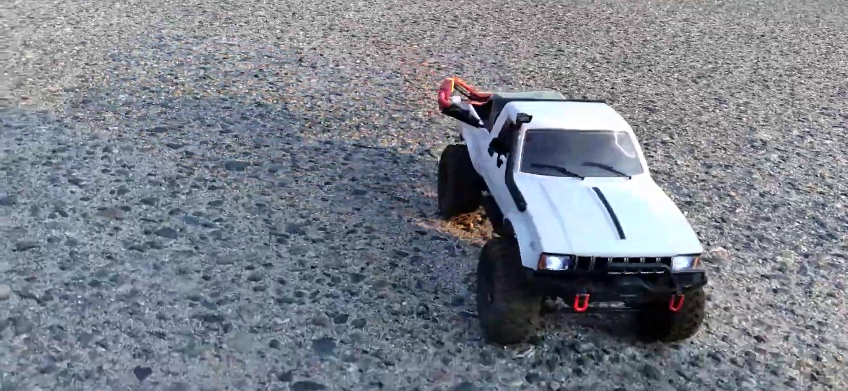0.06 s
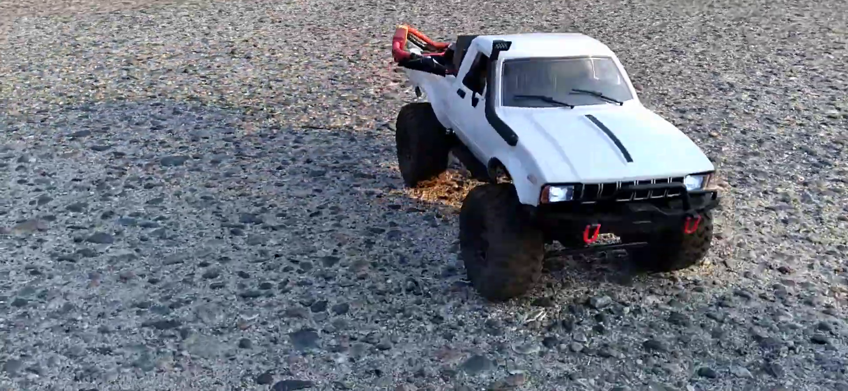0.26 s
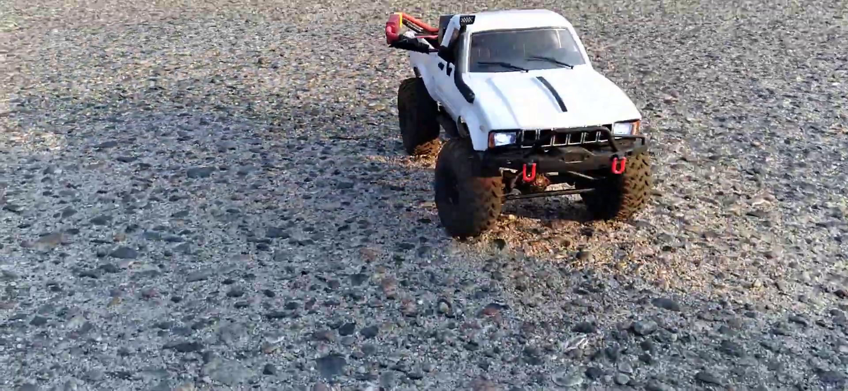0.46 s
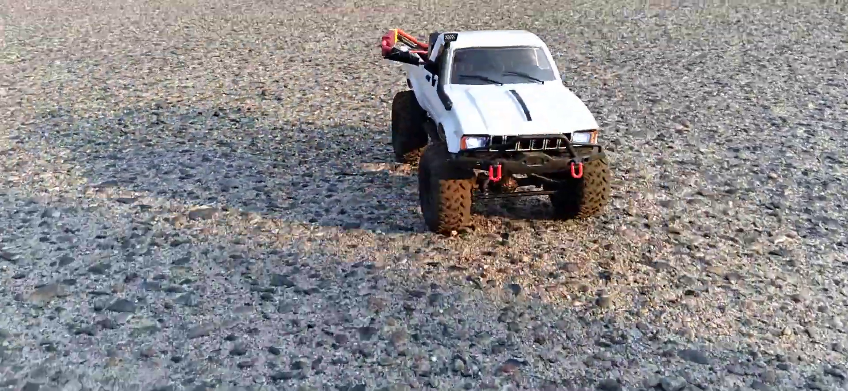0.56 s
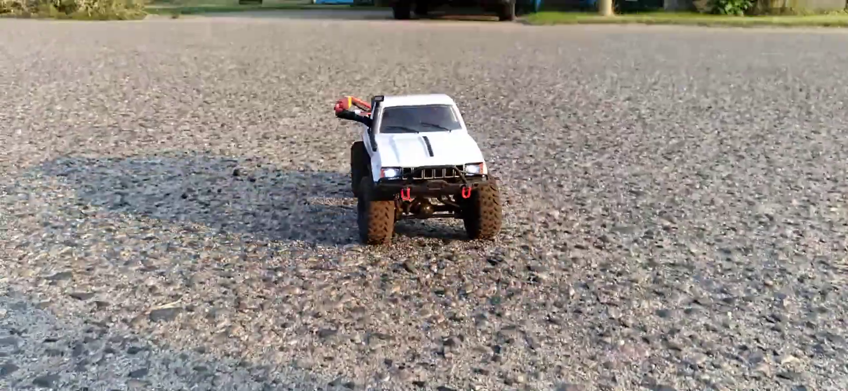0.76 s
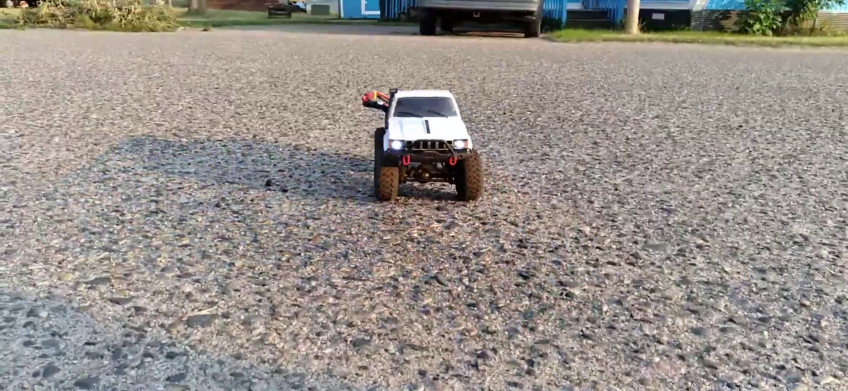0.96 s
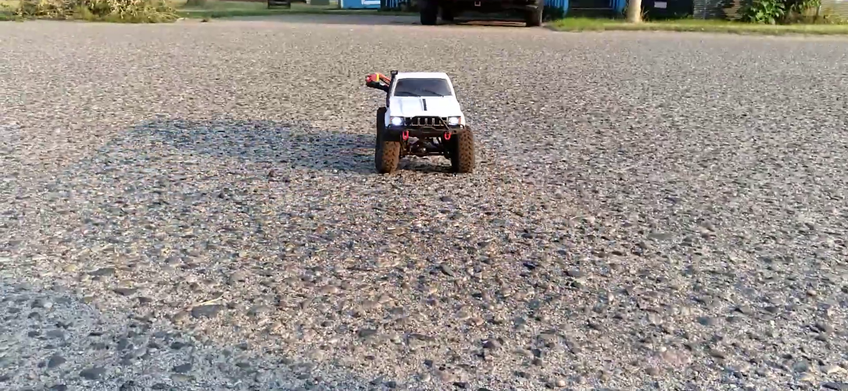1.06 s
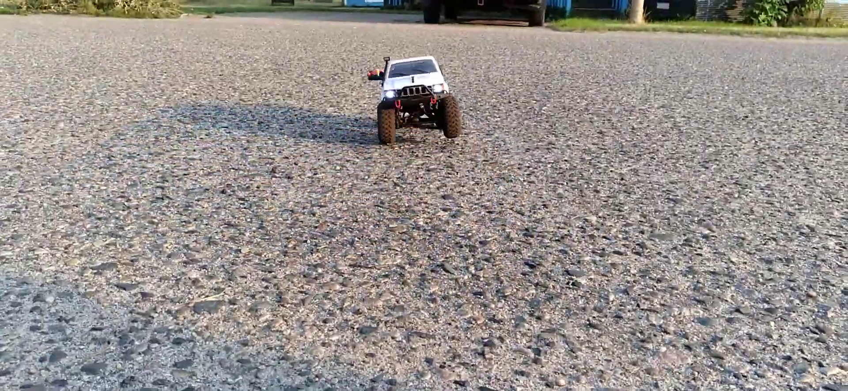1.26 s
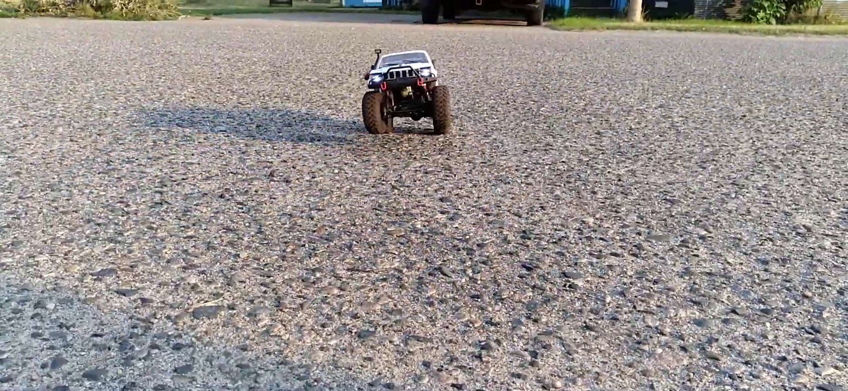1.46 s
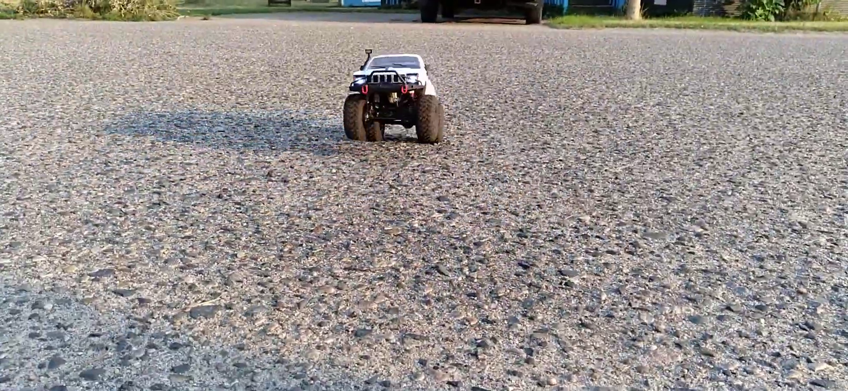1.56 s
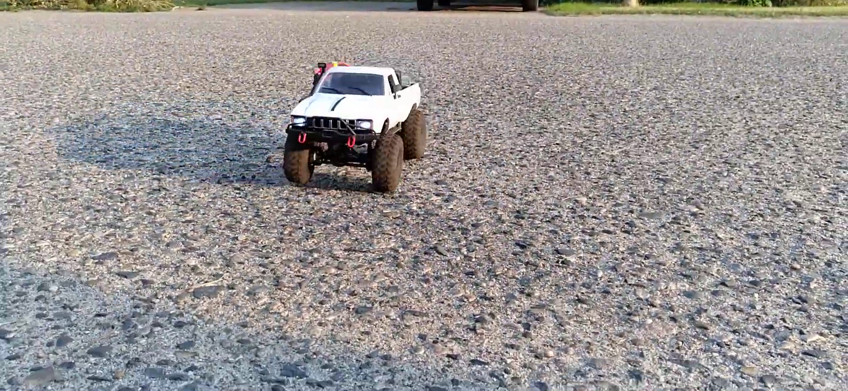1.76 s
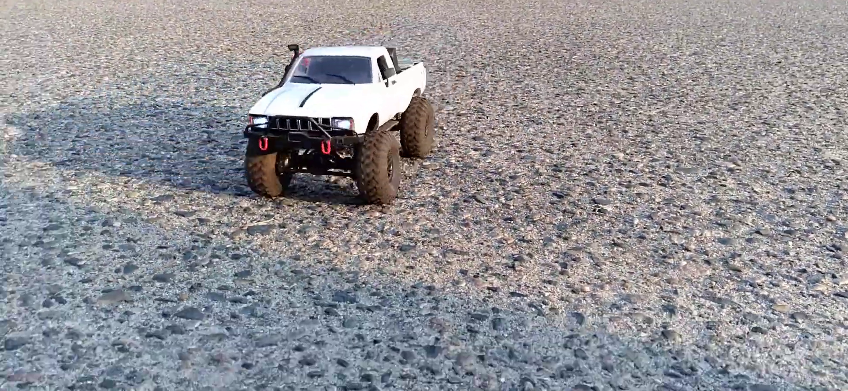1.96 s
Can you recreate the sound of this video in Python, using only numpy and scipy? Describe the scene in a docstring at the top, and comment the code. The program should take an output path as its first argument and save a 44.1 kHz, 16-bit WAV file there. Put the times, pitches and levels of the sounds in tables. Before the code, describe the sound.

Bright, scratchy plastic gear whirr from a toy electric truck, reversing, pausing, then darting forward and stopping

```python
"""The loose gear teeth of a small electric model truck rattle its plastic shell: random scrapes through modes.
It backs away over coarse asphalt, stops, darts forward and stops, near a phone with two microphone ports.
Gear mesh tones whine, grains of tone whirr, and noise bursts make driveline clacks and dull axle knocks.
Tyres hum as narrow noise, wind puffs thump the right port as sagging tones, and soft noise is the outdoor air."""
import sys
import numpy as np
from scipy import signal
from scipy.fft import rfft, irfft
from scipy.io import wavfile
from scipy.ndimage import uniform_filter1d, map_coordinates

SR = 44100
rng = np.random.default_rng(int(sys.argv[2]) if len(sys.argv) > 2 else 0)


def dump_mix(stems):
    """Bounce the given channels to the path in sys.argv[1] as a 16-bit WAV at rate SR."""
    frames = np.atleast_2d(stems).T  # one column per channel
    limited = np.clip(frames, -1, 1)  # hard clip at full scale
    pcm = np.round(limited * 32767).astype(np.int16)
    wavfile.write(sys.argv[1], SR, pcm)


N = 88200
T = np.arange(N) / SR

# Core band of the rattle, 7-11 kHz: (time [s], level before the common gain, pan and throb [dB])
RATTLE = [(0, -70.5), (.015, -52), (.09, -75), (.105, -51.5), (.14, -62), (.165, -40.5), (.19, -42.5),
          (.215, -47.5), (.23, -38), (.42, -33.5), (.47, -31), (.53, -24.5), (.56, -23.5), (.62, -30.5),
          (.85, -37.5), (1.01, -36), (1.1, -39), (1.17, -33), (1.195, -41.5), (1.216, -49), (1.226, -34.5),
          (1.26, -26.5), (1.52, -22), (1.6, -27), (1.69, -30.5), (1.73, -38.5), (1.79, -44), (1.835, -55.5),
          (1.87, -45), (1.93, -57), (2, -59)]
# Other bands relative to the core: (time [s], 4-7 kHz [dB], 2-4 kHz [dB], under 2 kHz [dB],
# over 11 kHz [dB], left minus right before the port offset [dB])
COLOUR = [(0, -9.5, -20, -16, -26, -1), (.14, -0.5, -9.5, -10.5, -38, -6.5), (.18, 5, -5, -8, -12, -5),
          (.4, 6, -8.5, -16, -10, -3), (.52, -3.5, -9.5, -29, -11.5, -3.5), (.58, 0, -12, -21, -7, -5),
          (.72, 2, -6.5, -17.5, -6.5, -4.5), (1.0, -2, -7, -28, -7, -5.5),
          (1.15, -5.5, -7, -23, -7.5, -0.5), (1.25, -2, -14, -17.5, -7.5, -0.5),
          (1.35, -5, -16.5, -34, -13.5, -3.5), (1.5, -7.5, -18, -46.5, -12.5, 0.5),
          (1.66, -2, -17, -37.5, -13.5, -2), (1.76, -9, -25, -17, -1.5, -1), (2, -10, -9, -14, 2, -0.5)]
# Centres of the core band and then the others, in the order of COLOUR: (frequency [Hz])
BAND_CENTRES_HZ = [8800, 5300, 3000, 1350, 13500]
# How far each band follows the gear throb, in the same order: (share [1])
THROB_SHARES = [1, .5, .4, .4, .3]
# Broad colour of the plastic shell: (frequency [Hz], gain [dB])
SHELL = [(250, -28), (500, -20.5), (900, -21), (1400, -17), (2200, -13.5), (3300, -16.5), (4200, -18.5),
         (4700, -8), (6850, -8.5), (9400, -1.5), (11500, 0), (16000, -1.5)]
# Shell modes, before the broad colour: (frequency [Hz], width [Hz], backing level [dB],
# forward level [dB], left minus right [dB])
SHELL_MODES = [(1289, 267, 3.5, -2.5, 1.5), (2556, 93, -0.5, -1.5, -6), (3307, 63, 1, -1.5, 11.5),
               (3876, 122, -8, 5.5, -5.5), (5420, 155, -5.5, -2, 2.5), (7497, 25, 0, -2, 22.5),
               (8050, 48, -2.5, -4, 32.5), (8414, 133, 2.5, 11.5, 9.5), (8814, 176, 7, 10.5, -8),
               (9300, 154, 0.5, -32, -23), (9360, 560, -44, 14, -8.5)]
# Two out-of-round gears: (turns per mesh cycle [1], throb [dB])
GEARS = [(1 / 68, 2.5), (1 / 121.5, 1.8)]
# Outdoor background colour: (frequency [Hz], gain [dB])
AIR = [(20, -39), (50, 6), (200, 2.5), (1400, -9), (2500, -10.5), (5000, -23), (9000, -7), (16000, -18)]
# Tyres rolling near the phone: (time [s], hum level [dB], rumble level [dB])
ROLL = [(.1, -78.5, -88), (.25, -60, -81), (.4, -56.5, -61.5), (.5, -66, -69), (.65, -66, -78),
        (.76, -59.5, -66), (1.1, -67.5, -62.5), (1.3, -87, -94)]
# Driveline clacks: (time [s], level [dB], ring pitch [Hz], left minus right [dB], rise [s],
# time to fall 60 dB [s], share of broad crack [1])
CLACKS = [(.009, -31, 9100, -8, 0.00062, 0.014, 0.047), (0.114, -35.5, 8500, -1, 0.0027, 0.013, 0.35),
          (0.16, -31, 7250, 2, .001, 0.032, 0.29), (0.171, -25.5, 7200, 0, 0.005, 0.073, 0.29),
          (0.221, -18.5, 8000, -2, 0.0048, 0.026, 0.15), (0.2447, -13.5, 8130, 3, 0.0016, 0.022, 0.059),
          (0.267, -18, 7300, -1, 0.0042, 0.049, .15), (0.295, -22, 9000, 0, .002, .025, 0.18),
          (.557, 0, 9300, -7, 0.0015, 0.034, 0.042), (0.569, -9, 9300, 2, 0.001, 0.021, 0.2),
          (1.097, -15, 8350, 8, 0.0015, 0.0085, 0.63), (1.1456, -7, 8000, 10.5, 0.00029, 0.0092, 0.2),
          (1.245, -12, 7290, 3, 0.0042, 0.004, 0.11), (1.352, -10, 9600, 13.5, 0.00067, 0.029, 0.23),
          (1.7038, -15, 8050, -1, 0.0066, 0.056, 0.087), (1.78, -24.5, 8260, -14, 0.0014, 0.024, 0.055),
          (1.842, -38, 8200, 9, 0.00046, 0.013, 0.6), (1.857, -17, 8450, -11, 0.0011, 0.039, 0.017),
          (1.887, -34, 8500, -9, 0.0022, 0.086, 0.029)]
# Gear tones: (time [s], mesh pitch [Hz], mesh whine level [dB], low whine level [dB])
WHINE = [(.16, 3004, -110, -110), (.24, 4400, -80, -55), (.27, 4913, -80, -45), (.31, 5490, -70, -47.5),
         (.37, 4220, -82, -67), (.41, 4500, -75, -47.5), (.5, 5330, -65, -43), (.535, 5750, -65, -42),
         (.58, 5907, -110, -88), (1.27, 4506, -62, -81), (1.305, 4600, -29, -50), (1.35, 4766, -28, -51),
         (1.535, 4830, -25, -50), (1.555, 4810, -38, -46), (1.61, 4980, -26, -67),
         (1.68, 5190, -65.5, -100)]
# Axle and body knocks: (time [s], level [dB], pitch [Hz], share of ring [1])
KNOCKS = [(.17, -33.5, 1160, 0.22), (.377, -36, 730, 0.74), (.45, -36.5, 1010, 0.13),
          (0.608, -32.5, 413, 0.18), (1.232, -35, 503, .2), (1.25, -24, 511.6, 0.36),
          (1.334, -30.5, 574, 0.053), (1.705, -36, 790, 0.097), (1.74, -40, 1225, 0.9),
          (1.821, -48.5, 485.4, 1.9)]
# Narrow grainy whirr while the truck backs: (time [s], centre [Hz], level [dB])
WHIRR = [(.2, 5000, -90), (.31, 5150, -34), (.375, 5420, -26), (.415, 5250, -27), (.455, 5400, -37),
         (.5, 5350, -28), (.56, 4700, -27), (.7, 5000, -90)]
# Wind at the right port: (time [s], peak level [dB], starting pitch [Hz], length unit [s])
PUFFS = [(0.807, -34.5, 96, 0.035), (0.879, -31, 119, 0.033), (0.895, -30.5, 75, 0.042),
         (0.961, -33, 92, 0.023), (1.025, -36.5, 78, 0.034), (1.191, -36.5, 80.6, 0.024)]

REVERSES_S = 1.21  # backing before, forward after
LEFT_LAG_S = 0.0002936
TEETH_PER_S, TOOTH_SCATTER_DB = 1900, 1.5
TOOTH_POWER_DECAY_S, HISS = .0007, 1.1
SHARED = 0.51  # share of rattle power common to both ports
MODE_WANDER, MODE_WANDER_PER_S = .015, 12  # wander as a share of mode pitch
MODE_FLICKER_DB = 3.5
ROUGH_DB, OWN_FLICKER_DB = .8, 1.2
RATTLE_GAIN_DB = 3  # gain added to every rattle band
LEFT_PORT_DB = 3  # the left port is this much more open to the rattle
AIR_DB = -67.5
HUM_HZ, HUM_WIDTH_HZ, RUMBLE_HZ = 206.4, 18, 132
CLACK_RING_WIDTH_HZ, CLACK_TAIL_DB, CLACK_TAIL_S = 150, -41, .12
CRACK_HZ, CRACK_WIDTH_HZ = 6000., 6000.
WHINE_JITTER, WHINE_FLUTTER_DB = .002, 2.
WHINE_THROB = .8  # share of the gears' throb
LOW_WHINE_RATIO, LOW_OVERTONE_DB = .1875, 7
LOW_BLUR_BACKING, LOW_BLUR_FORWARD = 1., .7  # radians
LOW_FLICKER_BACKING_DB, LOW_FLICKER_FORWARD_DB = 3.5, 1
KNOCK_T60_S, KNOCK_FLOOR_HZ = .07, 260
WHIRR_GRAIN_PER_S = 350
PUFF_LEFT_DB, PUFF_GRIT = -45, 0.098
TOP_HZ = 15900


def undb(db):
    """Decibels to an amplitude factor."""
    return 10 ** (np.asarray(db, float) / 20)


def col(table, count):
    """One column of a time table, drawn over the whole scene."""
    a = np.array(table, float)
    return np.interp(T, a[:, 0], a[:, count])


def on_log(table, hz):
    """Read a frequency table along a logarithmic pitch axis."""
    a = np.array(table, float)
    return np.interp(np.log(np.maximum(hz, 1)), np.log(a[:, 0]), a[:, 1])


def unit(x):
    """Scale to an RMS of one."""
    return x / np.sqrt(np.mean(x ** 2))


def ring(x, hz, width_hz):
    """One resonance, excited by x."""
    return signal.lfilter(*signal.iirpeak(hz, hz / width_hz, fs=SR), x)


def walk(rate):
    """Smooth random wander with an RMS of one, from about rate fresh draws a second."""
    k = int(SR / rate)
    steps = np.repeat(rng.standard_normal(N // k + 1), k)
    return unit(uniform_filter1d(uniform_filter1d(steps, k), k)[:N])


def ports(x, pan_db):
    """A source reaches the left microphone port a little late, with a level offset between the ports."""
    late = map_coordinates(x, [(T - LEFT_LAG_S) * SR], mode="nearest")
    return np.array([late * undb(pan_db / 2), x * undb(-pan_db / 2)])


def split_db(pan_db):
    """Share a left-minus-right offset between the two ports, in dB."""
    return np.array([[.5], [-.5]]) * pan_db


def gear_throb(mesh):
    """Out-of-round gears swell the level once per turn, in dB."""
    return sum(db * np.cos(turns * mesh) for turns, db in GEARS)


def teeth():
    """Random tooth knocks, each a short scrape of uneven size, over a finer hiss."""
    size = undb(TOOTH_SCATTER_DB * rng.exponential(size=N))
    hit = (rng.random(N) < TEETH_PER_S / SR) * size
    fade = np.exp(-1 / (TOOTH_POWER_DECAY_S * SR))
    power = unit(signal.lfilter([1], [1, -fade], hit ** 2))
    scrapes = power ** .5 * rng.standard_normal(N)
    return unit(scrapes + HISS * rng.standard_normal(N))


def shell(x):
    """Spectrum of the plastic shell: broad colour over flexing modes that differ backing and forward."""
    f = np.fft.rfftfreq(N, 1 / SR)
    modes = x * undb(-5.0)  # sound that bypasses the modes
    for hz, width, back_db, forward_db, pan_db in SHELL_MODES:
        gain = undb(np.where(T < REVERSES_S, back_db, forward_db) + split_db(pan_db))
        wander_hz = MODE_WANDER * hz * walk(MODE_WANDER_PER_S)
        shift = np.exp(2j * np.pi * np.cumsum(wander_hz) / SR)
        tone = np.real(signal.hilbert(ring(x, hz, width)) * shift)
        modes = modes + gain * undb(MODE_FLICKER_DB * walk(30.16)) * tone
    return rfft(modes) * undb(on_log(SHELL, f)), f


def rattle(mesh):
    """Loose teeth shake the shell, throbbing once per turn of two gears; each band has its own level."""
    common = ports(teeth(), 0)
    separate = np.array([teeth(), teeth()])
    x = np.sqrt(SHARED) * common + np.sqrt(1 - SHARED) * separate
    throb = gear_throb(mesh) * np.where(T < REVERSES_S, .4, 1)
    throb = throb + ROUGH_DB * (walk(41.4) + walk(150))
    spectrum, f = shell(x)
    order, out = np.argsort(BAND_CENTRES_HZ), 0
    for k in range(5):
        # Neighbouring bands cross-fade between their centres
        weight = np.interp(np.log(f + 1), np.log(np.sort(BAND_CENTRES_HZ)), order == k)
        band = irfft(spectrum * weight, N)
        # Even out the slow level before the table sets it
        band = band / np.sqrt(uniform_filter1d(np.mean(band ** 2, axis=0), SR // 8))
        db = col(RATTLE, count=1) + (col(COLOUR, count=k) if k else 0)
        flicker = THROB_SHARES[k] * throb + OWN_FLICKER_DB * walk(30.49)
        out = out + band * undb(db + flicker + RATTLE_GAIN_DB)
    return out * undb(split_db(col(COLOUR, count=5) + LEFT_PORT_DB))


def air():
    """Quiet outdoor background: coloured noise, partly shared by the ports, with a slow waver."""
    f = np.fft.rfftfreq(N, 1 / SR)
    n = rng.standard_normal((3, N))
    x = irfft(rfft(n[:2] + 1.9 * n[2]) * undb(on_log(AIR, f)), N)
    return unit(x) * undb(AIR_DB + 0.4 * walk(7.6))


def roll():
    """Tread blocks hum and rumble on the asphalt: noise through narrow and broad resonances."""
    n = rng.standard_normal((2, N))
    hum = unit(ring(ring(n[0], HUM_HZ, HUM_WIDTH_HZ), HUM_HZ, HUM_WIDTH_HZ))
    rumble = unit(ring(ring(n[1], RUMBLE_HZ, RUMBLE_HZ), RUMBLE_HZ, RUMBLE_HZ))
    return ports(hum * undb(col(ROLL, count=1)) + rumble * undb(col(ROLL, count=2)), 0)


def clacks():
    """Slack in the driveline: a short noisy crack with a ring and a faint tail."""
    out, t = np.zeros((2, N + SR)), np.arange(SR // 5) / SR
    for s, db, hz, pan_db, rise, t60, share in CLACKS:
        n = rng.standard_normal((2, len(t)))
        fall = undb(-60 * np.maximum(t - rise, 0) / t60)
        tail = undb(CLACK_TAIL_DB - 60 * t / CLACK_TAIL_S)
        envelope = np.minimum(t / rise, 1) * (fall + tail)
        crack = unit(ring(ring(n, CRACK_HZ, CRACK_WIDTH_HZ), CRACK_HZ, CRACK_WIDTH_HZ))
        body = share * crack + .5 * unit(ring(n, hz, CLACK_RING_WIDTH_HZ))
        i = int(s * SR)
        out[:, i:i + len(t)] += body * envelope * undb(db + split_db(pan_db))
    return out[:, :N]


def whine(mesh):
    """Rough, wavering tones of the gear mesh and of a slower stage."""
    backing = T < REVERSES_S
    high_db = col(WHINE, count=2) + WHINE_FLUTTER_DB * walk(89.6) + WHINE_THROB * gear_throb(mesh)
    high = np.sin(mesh + 0.13 * walk(900)) * undb(high_db)
    turn = LOW_WHINE_RATIO * mesh + np.where(backing, LOW_BLUR_BACKING, LOW_BLUR_FORWARD) * walk(200)
    # The octave overtone sounds only while backing
    low = np.sin(turn) + undb(LOW_OVERTONE_DB) * backing * np.sin(2 * turn)
    flicker = np.where(backing, LOW_FLICKER_BACKING_DB, LOW_FLICKER_FORWARD_DB) * walk(38.6)
    low = low * undb(col(WHINE, count=3) + flicker)
    return ports(high, 11.8) + ports(low, 0)


def knocks():
    """Dull knocks of axles and body as the load changes: fading noise through a ring and a broad thud."""
    out, t = np.zeros(N + SR), np.arange(SR // 5) / SR
    for s, db, hz, share in KNOCKS:
        n = rng.standard_normal(len(t))
        thud = unit(ring(ring(n, 620.0, 1500.0), 620.0, 1500.0))
        body = share * unit(ring(ring(n, hz, 83.0), hz, 65.0)) + 0.6 * thud
        i = int(s * SR)
        out[i:i + len(t)] += body * np.minimum(t / 0.0088, 1) * undb(db - 60 * t / KNOCK_T60_S)
    out = signal.sosfilt(signal.butter(2, KNOCK_FLOOR_HZ, "high", fs=SR, output="sos"), out[:N])
    return (ports(out, 0) + out) / 2  # low sound lags less between the ports


def whirr():
    """A wandering tone chopped by chance into short grains."""
    tone = np.sin(2 * np.pi * np.cumsum(col(WHIRR, count=1)) / SR) * walk(WHIRR_GRAIN_PER_S)
    return ports(tone * undb(col(WHIRR, count=2)), 5.6)


def puffs():
    """Wind eddies thump the right port: a few gritty, fast-fading cycles that sag in pitch."""
    out, grit = 0, unit(ring(ring(rng.standard_normal(N), 195.0, 100.0), 195.0, 100.0))
    for s, db, hz, length in PUFFS:
        u = np.clip((T - s) / length, 0, 4)
        wave = np.sin(2 * np.pi * hz * length * u * (1 - 0.054 * u)) + PUFF_GRIT * grit
        envelope = 11.5 * u ** 1.02 * np.exp(-u * 4.0) * (u < 4)  # peaks near one
        out = out + undb(db) * envelope * wave
    return out * undb([[PUFF_LEFT_DB], [0]])


def scene():
    """One jittering mesh phase drives rattle and whine; all sources add at the two ports."""
    mesh_hz = col(WHINE, count=1) * (1 + WHINE_JITTER * walk(60))
    mesh = 2 * np.pi * np.cumsum(mesh_hz) / SR
    truck = rattle(mesh) + roll() + clacks() + whine(mesh) + knocks() + whirr()
    return truck + air() + puffs()


def record(dry):
    """The phone rounds the loudest peaks and cuts the top."""
    return signal.sosfilt(signal.ellip(10, .2, 80, TOP_HZ, fs=SR, output="sos"), np.tanh(dry))


dry = scene()
out = record(dry)
dump_mix(out)
```